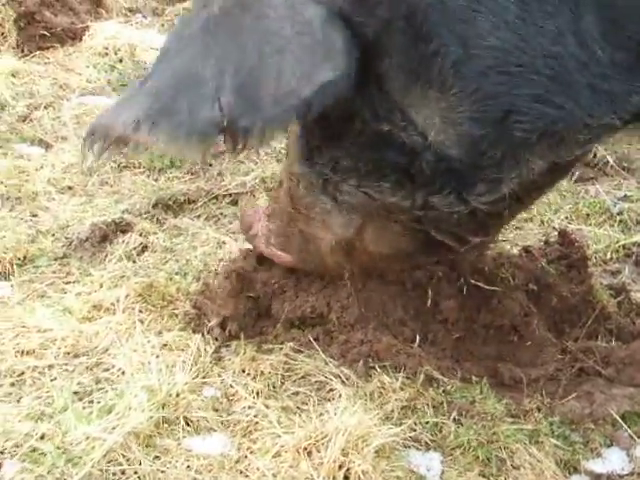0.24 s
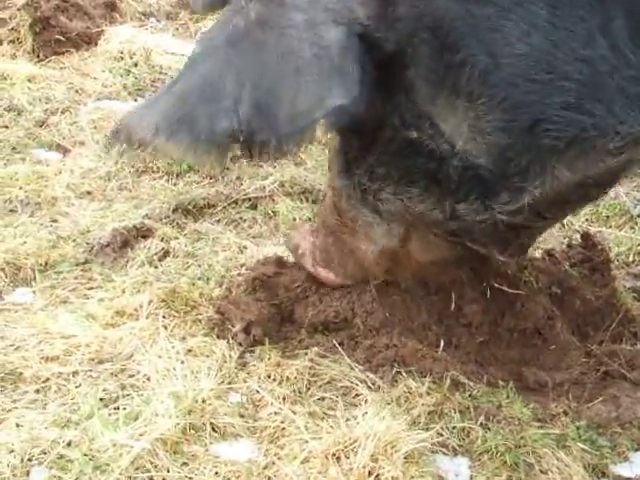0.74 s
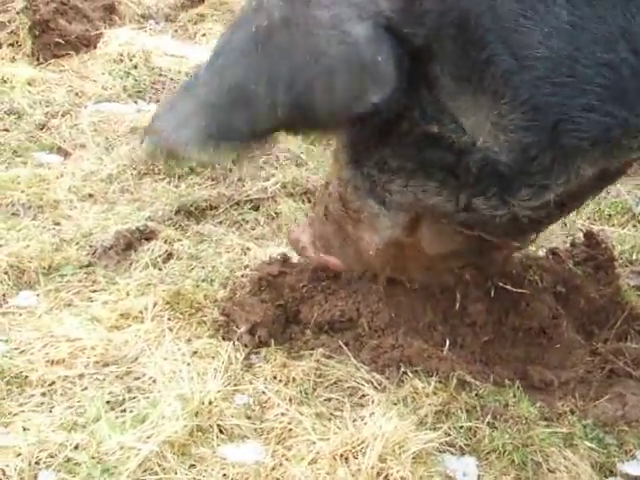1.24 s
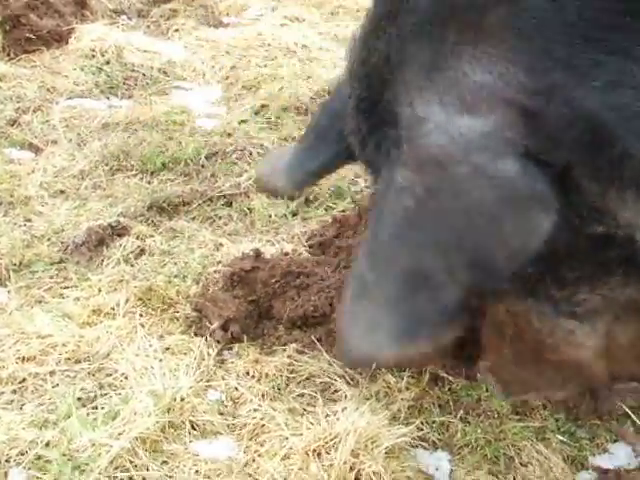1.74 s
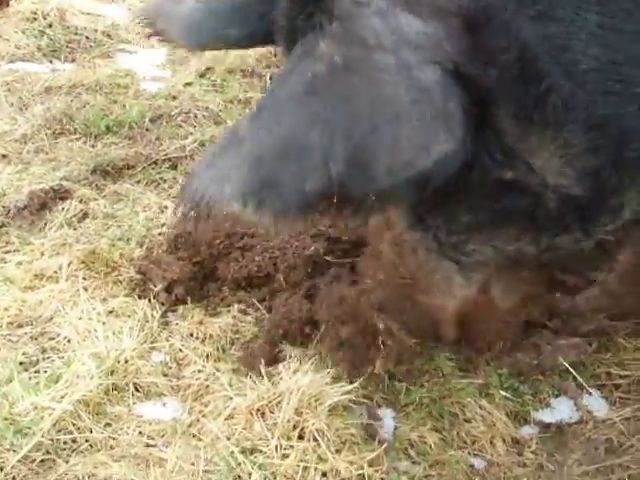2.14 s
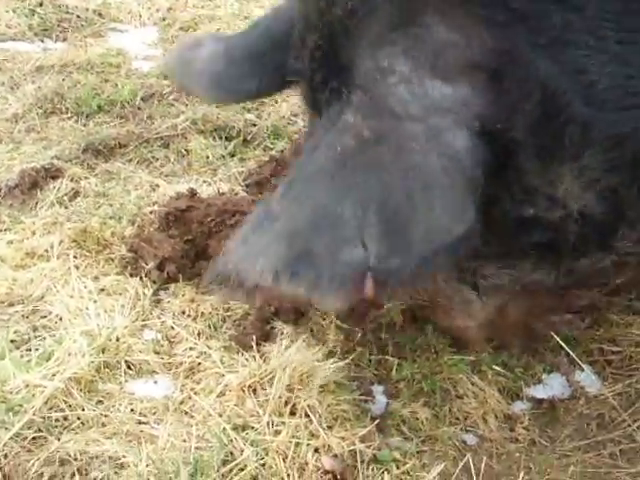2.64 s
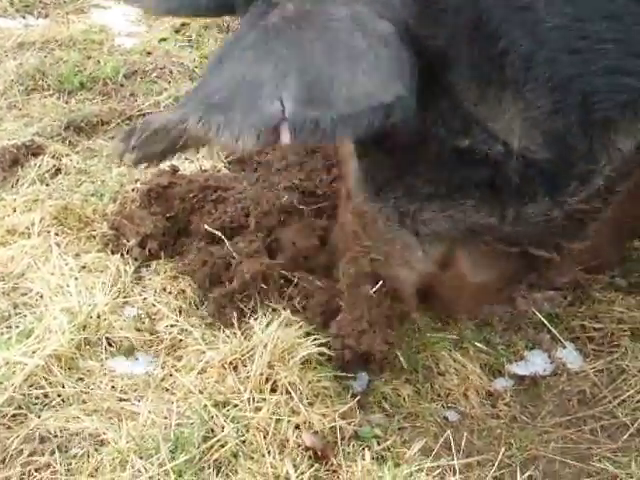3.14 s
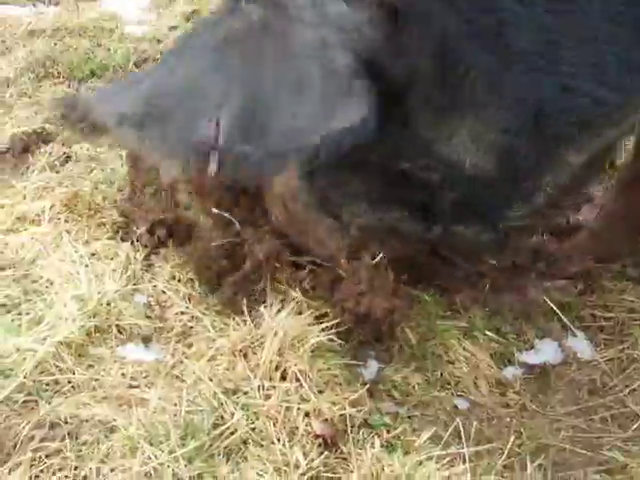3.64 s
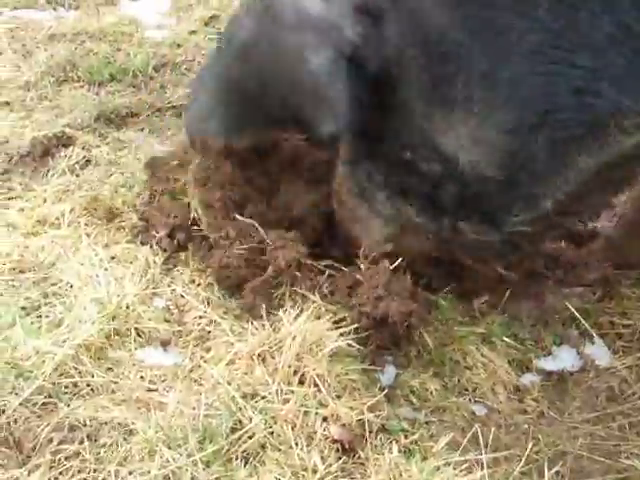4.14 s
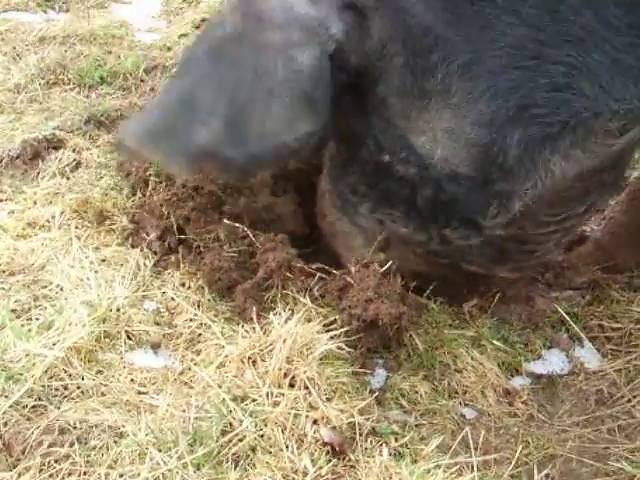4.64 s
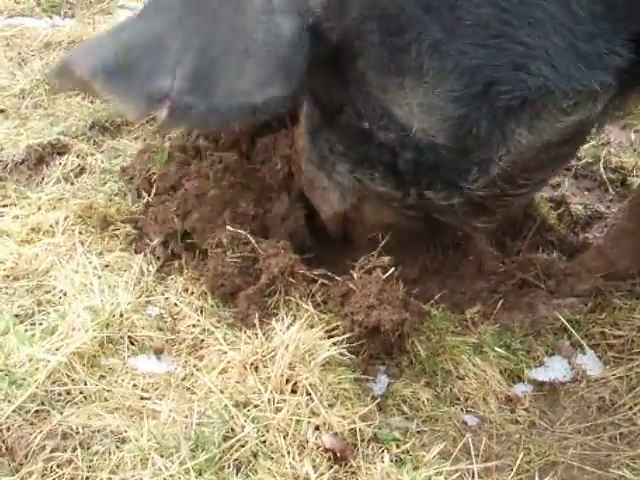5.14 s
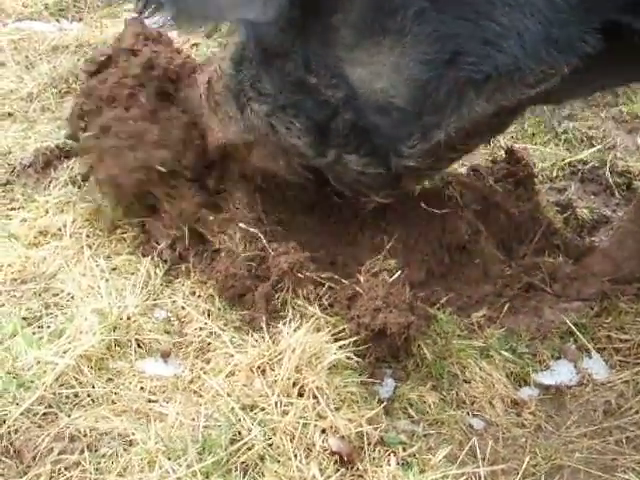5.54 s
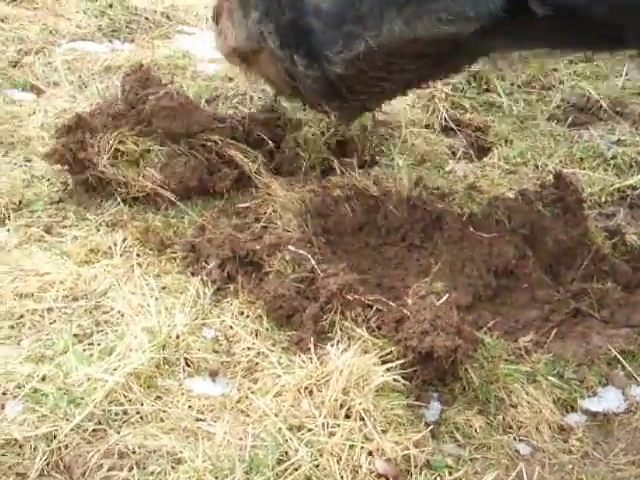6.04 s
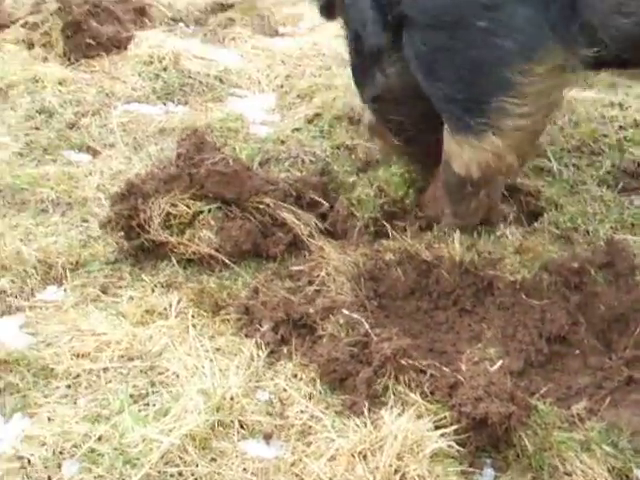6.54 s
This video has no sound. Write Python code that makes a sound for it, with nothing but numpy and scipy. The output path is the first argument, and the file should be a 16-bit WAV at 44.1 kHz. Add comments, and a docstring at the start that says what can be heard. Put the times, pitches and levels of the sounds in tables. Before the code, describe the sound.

A pig roots through soil and dry grass with crackles, snaps and wet lip smacks, while chicks peep softly nearby.

```python
"""Pig rooting in a pasture

A pig shoves its snout through crumbly soil and dry grass: roots snap, its lips smack, clods tumble
and it snuffles. Chicks peep and twitter softly nearby, each twitter sung by both sides of the syrinx.
Underneath lies a bed of steady hiss, light wind and a camera's thin whine."""
import sys
import numpy as np
from scipy import signal
from scipy.fft import rfft, irfft, next_fast_len
from scipy.io import wavfile
from scipy.ndimage import map_coordinates

SR = 44100
rng = np.random.default_rng(int(sys.argv[2]) if len(sys.argv) > 2 else 0)


def log_audio(samples):
    """Write samples as a 16-bit WAV file to the path given in sys.argv[1]."""
    # one column per channel
    frames = np.atleast_2d(samples).T
    # limit to full scale, then quantise
    limited = np.clip(frames, -1, 1)
    pcm = np.round(limited * 32767).astype(np.int16)
    wavfile.write(sys.argv[1], SR, pcm)


N = 298557
TIME = np.arange(N) / SR

# tone of the steady hiss: freq_hz, gain_db
HISS_EQ = [(50, -19.5), (110, -11.5), (280, 3.5), (600, -4.5), (1150, -4.5), (1900, -4), (2800, -3.5),
           (5000, -6), (7600, -7.5), (9000, -9)]
# low rumble of wind: freq_hz, gain_db
WIND_EQ = [(8, -5), (25, -2), (42, 0), (60, -2), (85, -5.5), (120, -10), (200, -22), (500, -50)]
# breaths of wind on the microphone: peak_s, length_s, level_db
WIND_PUFFS = [(.63, 0.11, -53), (1.3, 0.25, -52), (2.15, 0.13, -58), (3.37, 0.18, -53.5), (4.63, 0.27, -56),
              (6.12, 0.56, -56.5)]
# the light air between them: time_s, level_db
BREEZE_LEVELS = [(0, -60), (.3, -60), (.6, -57), (2.4, -56.5), (2.9, -59), (4, -58), (5.2, -55.5),
                 (5.6, -58), (6.77, -54)]
# the two tones of the camera's whine: pitch_hz, level_db
WHINE_TONES = [(7867, -61), (8133, -61.5)]

# light nuzzling between the shoves: time_s, level_db
NUZZLE_LEVELS = [(0, -60.5), (.6, -61.5), (1.6, -57.5), (2.6, -59.5), (3.9, -62.5), (5.2, -58), (5.6, -61),
                 (6.77, -59.5)]
# shoves of the snout: peak_s, length_s, soil_db, grass_db
SNOUT_SHOVES = [(.24, .11, -60, -57.5), (1.001, 0.11, -61.5, -66.5), (1.448, .13, -53.5, -53),
                (1.981, .14, -50, -52), (2.2, 0.1, -57, -63), (2.45, 0.059, -59, -54),
                (2.589, 0.11, -60, -60.5), (2.795, 0.082, -49.5, -53), (2.907, 0.19, -51, -50),
                (3.202, 0.095, -54.5, -55.5), (3.35, 0.12, -52.5, -55.5), (3.569, 0.19, -51, -54),
                (3.838, .1, -57, -67.5), (4.109, 0.22, -55, -59), (4.271, .08, -52.5, -53.5),
                (4.465, 0.089, -61, -53), (4.799, 0.054, -56, -59), (4.975, 0.27, -62.5, -56),
                (5.755, 0.052, -59, -60), (6.078, 0.28, -60.5, -53), (6.294, .11, -61, -54),
                (6.449, .14, -62, -49.5), (6.621, .09, -59, -57), (6.76, .05, -53.5, -59)]
# dull body of crumbling soil: freq_hz, gain_db
SOIL_EQ = [(80, -24.5), (170, 0), (300, 1), (700, 2.5), (1200, -5.5), (2200, -2), (4000, -26.5),
           (8000, -47.5)]
# bright crackle of dry grass: freq_hz, gain_db
GRASS_EQ = [(500, -23.5), (1200, -7.5), (2000, -1), (3300, 2.5), (5000, 2.5), (7500, 0), (9000, 1)]
# ticking crumbs and stalks of several sizes: pitch_hz, gain_db
STALK_TICKS = [(900, -10.5), (1900, -2), (3100, -1.5), (4600, -6), (6800, 2.5)]

# peeps, a few of them short steep falls trailing a twitter: start_s, length_s, pitch_hz, glide_share,
# arch_share, level_db (shares of the pitch)
CHICK_PEEPS = [(0.085, .066, 2600, -0.041, .13, -51), (.657, 0.038, 2880, -.17, 0, -55.5),
               (.729, .08, 2400, -.18, 0, -58.5), (1.04, 0.044, 4150, -.04, 0.014, -51.5),
               (1.708, 0.072, 2516, 0.13, .04, -48.5), (1.816, 0.066, 2670, -0.0081, -0.0096, -47.5),
               (2.204, .032, 2950, -.3, 0, -50), (2.355, 0.034, 2910, -0.12, 0.0053, -48),
               (2.567, 0.063, 2640, -.18, -.05, -51), (3.005, 0.12, 2230, -0.084, -0.037, -56),
               (3.261, 0.07, 2300, .05, 0.016, -57.5), (3.451, 0.22, 2080, -0.0085, 0.04, -59.5),
               (3.67, 0.058, 2300, .05, 0, -59), (3.793, 0.084, 2400, -0.13, .1, -52.5),
               (4.238, .065, 2860, -0.31, 0, -52.5), (4.967, 0.049, 2670, -.09, .12, -47.5),
               (5.075, .085, 2490, -.08, 0, -55.5), (5.168, .025, 2700, -.15, 0, -51),
               (5.6, 0.035, 2890, -0.25, .03, -48), (5.648, 0.025, 2820, -.13, -0.0086, -53),
               (5.67, .075, 2510, -0.041, 0.014, -52), (5.74, .026, 2710, -.1, 0, -52),
               (6.347, 0.045, 2730, -0.0098, 0.0041, -50)]
# a twitter's lower voice, timed from the hitch in its pitch: offset_s, pitch_hz, gain_db
SYRINX_LOW = [(-.06, 4700, -16.5), (-.04, 4750, -4), (-.028, 4492, -12.5), (-.022, 3984, -7),
              (-.016, 3637, 2), (-.007, 3162, -2.5), (0, 3600, 1), (.008, 2865, 3.5), (.02, 2490, -9.5),
              (.027, 2440, -37)]
# its upper voice, from the other side of the syrinx: offset_s, pitch_hz, gain_db
SYRINX_HIGH = [(-.03, 3873, -41.5), (-.017, 4150, -7.5), (-.004, 4480, 0), (.001, 4438, -21.5),
               (.006, 3920, 0.5), (.014, 3200, -8), (.025, 2625, -16.5), (.031, 2505, -37.5)]
# runs of evenly spaced twitters: first_s, last_s, pitch_ratio, level_db
TWITTER_RUNS = [(.534, .534, 0.75, -55), (0.952, 2.635, 1.0, -49.5), (4.272, 4.945, .99, -47.5),
                (5.208, 5.208, 0.91, -53)]
# the rest of the brood joins in: peak_s, length_s, level_db
BROOD_SWELLS = [(1.3, 0.42, -52), (2.45, .5, -60), (4.55, 0.46, -54.5)]

# roots breaking: break_s, level_db, centre_hz, splinter_share (0 a clean crack, 1 all splinters)
ROOT_SNAPS = [(.162, -46, 4800, .5), (.2342, -48.5, 3500, 0.5), (.9779, -47.5, 2750, 0.76),
              (1.1113, -48, 5600, 1), (1.2091, -36.5, 3500, 0.8), (1.4047, -44.5, 3560, 0.7),
              (1.422, -42.5, 2810, 0.55), (1.4656, -44.5, 3050, .5), (1.967, -47, 4780, .2),
              (1.979, -45, 3970, .3), (1.988, -46, 3130, .6), (2.0002, -42, 3030, 0.5),
              (2.0494, -44.5, 4570, 0.3), (2.0776, -35, 3900, 0.08), (2.13, -45.5, 2177, 0.6),
              (2.1976, -45.5, 2840, .8), (2.2271, -37.5, 8040, 0.92), (2.379, -45, 5860, 0.2),
              (2.4705, -47.5, 5470, 0.5), (2.538, -43.5, 6414, 0.4), (2.7675, -45.5, 2470, 0.7),
              (2.8639, -42.5, 4900, .2), (2.909, -34, 3530, 0.2), (2.9639, -45, 3360, 0.5),
              (3.0354, -45, 3620, 0.06), (3.0998, -46, 5500, 0.2), (3.2379, -43, 4700, 0.5),
              (3.3185, -46, 5700, 0.6), (4.3261, -43, 3300, 0.1), (4.4472, -43.5, 4560, .3),
              (4.4521, -41.5, 4817, 0.4), (4.5464, -32.5, 5160, 0.19), (4.9002, -50, 6200, 0.3),
              (4.9075, -41, 3980, .1), (5.1059, -48.5, 4660, 0.7), (5.1877, -45.5, 3600, 0.9),
              (5.4094, -42, 4960, 0.57), (5.5332, -42, 5222, 0.4), (5.8025, -44, 5780, 0.5),
              (6.4297, -41.5, 4700, 0.9), (6.437, -41, 3640, 1)]
# wet smacks of lips and snout: start_s, level_db, pitch_hz
LIP_SMACKS = [(.2258, -42, 1340), (.307, -42, 2680), (.6467, -51, 973), (1.2089, -38, 3790),
              (1.2401, -36, 1970), (1.4222, -44, 1800), (1.463, -48, 2140), (2.2936, -46, 2074),
              (2.2939, -39, 2790), (2.3111, -48, 2130), (2.445, -48, 680), (2.449, -47, 2060),
              (2.7602, -42.5, 1210), (3.0101, -38, 3100), (3.0173, -38, 3280), (4.049, -47.5, 637),
              (4.1519, -45.5, 718), (4.4973, -34, 1950), (4.5471, -40.5, 1763), (5.0524, -49, 1060),
              (5.0633, -51.5, 706), (5.2349, -45, 606), (6.5752, -41.5, 3570), (6.6317, -46, 687)]
# loosened earth tumbling back onto the turf: start_s, length_s, centre_hz, level_db
FALLING_CLODS = [(1.183, 0.09, 257, -58), (1.952, 0.065, 898, -52.5), (2.799, 0.151, 300, -54.5),
                 (3.295, 0.36, 701, -59.5), (5.879, 0.38, 300, -56), (6.42, 0.046, 850, -52.5)]
# air blown through the snout into the soil: start_s, length_s, centre_hz, level_db
SNOUT_PUFFS = [(2.752, 0.026, 1260, -46), (2.785, 0.028, 1080, -44), (3.049, 0.039, 710, -53.5),
               (3.189, 0.029, 736, -50.5), (3.803, 0.074, 371, -53.5), (4.019, 0.051, 760, -49),
               (4.12, 0.057, 637, -51), (4.128, 0.11, 407, -52.5), (4.211, .075, 624, -52),
               (4.803, 0.07, 676, -53), (5.726, 0.062, 690, -50)]
# treble roll-off over the whole mix: freq_hz, gain_db
TREBLE_EQ = [(7700, 0.5), (8200, -6.5), (8600, -16.5), (8900, -28.5), (9200, -49.5)]

WHINE_FLIPS_PER_S, TOP_HZ = 30, 9222
NUZZLE_GRASS_DB = -1.5  # shifts the grass layer while nuzzling
TWITTER_GAP_S, TWITTER_TEMPO_SPREAD, BROOD_REST_DB = .138, .1, -61.5
RUN_SAG_DB, RUN_SAG_PITCH = 3.5, .062  # a run is softer and lower at both ends
ECHO_DB, ECHO_T60_S = -6.5, .14
FIBRE_HZ, FIBRE_DB, FIBRE_SCATTER_DB = 4800, 4, 2  # level rides on the shove's grass
CRACK_WIDTH_HZ, SPLINTER_WIDTH_HZ = 7172, 4620  # a clean break is broader than a splintering one
BREAK_S, BREAK_RAGGED = .00055, .18  # the strands of a root do not all part at once
JOLT_HZ, JOLT_DB = 910, -9  # a root that parts cleanly jolts the soil round it
SMACK_HZ, SMACK_T60_S, SMACK_SIZE_LAW = 2020, .022, .93  # larger, lower pockets ring longer


def amp(db):
    """Decibels to gain."""
    return 10 ** (np.asarray(db) / 20)


def unit(x):
    """Scale to rms 1."""
    return x / np.sqrt(np.mean(x ** 2) + 1e-20)


def wobble(rate, size=N):
    """A smooth random curve, rate knots a second."""
    knots = rng.standard_normal(int(size * rate / SR) + 4)
    return map_coordinates(knots, [np.arange(size) * rate / SR])


def filtered(x, response):
    """Filter x by a gain given as a function of frequency."""
    size = next_fast_len(N + 8192)
    return irfft(rfft(x, size) * response(np.fft.rfftfreq(size, 1 / SR)), size)[:N]


def eq(x, points):
    """Shape x by (freq_hz, gain_db) points on a log axis."""
    freqs, db = np.transpose(points)
    return filtered(x, lambda hz: amp(np.interp(np.log(hz + 1), np.log(freqs), db)))


def resonate(x, hz, *widths_hz):
    """Pass x through a resonance at hz, once for each width."""
    for width in widths_hz:
        x = signal.lfilter(*signal.iirpeak(hz, hz / np.clip(width, 30, 8000), SR), x)
    return x


def add(track, s, x):
    """Mix x into the track from time s."""
    part = track[max(round(s * SR), 0):][:len(x)]
    part += x[:len(part)]


def burst(x, db):
    """Scale a short sound so that its energy equals 10 ms at this level."""
    return amp(db) * x * np.sqrt(.01 * SR / np.sum(x ** 2))


def grains(rate, spread_db):
    """Tiny fractures of unequal size at random moments, rate a second."""
    happens = rng.random(N) < rate / SR
    size = amp(spread_db * np.minimum(rng.exponential(size=N), 4))
    return unit(happens * size * rng.choice([-1, 1], N))


def swells(rows, rest_db):
    """A fader ride: bell-shaped swells (peak_s, length_s, level_db) add their power to a resting level."""
    power = sum(amp(db) ** 2 * np.exp(-np.pi * ((TIME - s) / length) ** 2) for s, length, db in rows)
    return np.sqrt(amp(rest_db) ** 2 + power)


def background():
    """The bed: steady hiss, wind buffeting the microphone and a whine that keeps flipping polarity."""
    hiss = amp(-51.5) * unit(eq(rng.standard_normal(N), HISS_EQ))
    buffet = unit(eq(rng.standard_normal(N), WIND_EQ) * amp(2 * wobble(12)))
    wind = swells(WIND_PUFFS, np.interp(TIME, *np.transpose(BREEZE_LEVELS))) * buffet
    polarity = np.sign(np.sin(np.pi * WHINE_FLIPS_PER_S * TIME))
    whine = sum(amp(db) * np.sqrt(2) * np.sin(2 * np.pi * hz * TIME) for hz, db in WHINE_TONES)
    return hiss + wind + polarity * whine


def rooting():
    """Under the snout, soil crumbles and dry grass crackles in clumps, dotted with ticking stalks."""
    nuzzle_db = np.interp(TIME, *np.transpose(NUZZLE_LEVELS))
    soil_gain = swells([(s, length, db) for s, length, db, _ in SNOUT_SHOVES], nuzzle_db)
    grass_shoves = [(s, length, db) for s, length, _, db in SNOUT_SHOVES]
    grass_gain = swells(grass_shoves, nuzzle_db + NUZZLE_GRASS_DB)
    clumps = amp(2 * wobble(80))
    crumbs = grains(rate=450, spread_db=3.5) + .5 * rng.standard_normal(N)
    crackle = grains(rate=1000, spread_db=1) + .5 * rng.standard_normal(N)
    soil = unit(eq(crumbs, SOIL_EQ) * clumps * amp(2.15 * wobble(40)))
    grass = unit(eq(crackle, GRASS_EQ) * clumps)
    ticks = unit(sum(amp(db) * unit(resonate(grains(rate=45, spread_db=3.5), hz, .22 * hz))
                     for hz, db in STALK_TICKS))
    return soil_gain * amp(-.5) * soil + grass_gain * (amp(5.5) * grass + amp(-2) * ticks)


def whistle(hz, waver):
    """A pure bird tone that flutters in pitch and strength."""
    pitch = hz * (1 + waver * wobble(168.9, size=len(hz)))
    flutter = amp(2.6 * wobble(130, size=len(hz)) - .7)
    return np.sqrt(2) * np.sin(2 * np.pi * np.cumsum(pitch) / SR) * flutter


def peeps():
    """Soft whistles that glide, most with an arch in their pitch; a few short steep ones trail a twitter."""
    out = np.zeros(N)
    for s, length, hz, glide, arch, db in CHICK_PEEPS:
        progress = np.linspace(0, 1, int(length * SR))
        bow = np.abs(np.sin(np.pi * progress))
        pitch = hz * (1 + glide * (progress - .5) + arch * (bow - .5))
        add(out, s, amp(db) * bow ** .32 * whistle(pitch, waver=.016))
    return out


def twitters(calls):
    """Quick falling calls with a hitch in them, one voice from each side of the syrinx."""
    out = np.zeros(N)
    for s, ratio, db in calls:
        tempo = np.exp(rng.normal(0, TWITTER_TEMPO_SPREAD))
        for voice in (SYRINX_LOW, SYRINX_HIGH):
            offsets, hz, gain_db = np.transpose(voice)
            offsets = offsets * tempo
            t = np.arange(offsets[0], offsets[-1], 1 / SR)
            pitch = ratio * rng.normal(1, .01445) * np.interp(t, offsets, hz)
            envelope = amp(db + np.interp(t, offsets, gain_db))
            add(out, s + offsets[0], envelope * whistle(pitch, waver=.02535))
    return out


def brood_calls():
    """Cues for the brood's faint, irregular chatter: time_s, pitch_ratio, level_db."""
    moments = np.cumsum(rng.uniform(.04, .16, size=66))
    level_db = 20 * np.log10(swells(BROOD_SWELLS, BROOD_REST_DB))
    return [(s, rng.uniform(.77, 1.05), np.interp(s, TIME, level_db)) for s in moments]


def run_calls():
    """Cues for runs that swell and rise towards their middle: time_s, pitch_ratio, level_db."""
    for first, last, ratio, db in TWITTER_RUNS:
        count = round((last - first) / TWITTER_GAP_S) + 1
        for k, s in enumerate(np.linspace(first, last, count)):
            sag = 1 - np.sin(np.pi * (k + .5) / count)
            yield s, ratio * (1 - RUN_SAG_PITCH * sag), db - RUN_SAG_DB * sag


def chicks():
    """Twitters and peeps, with a short echo scattered back by the pasture."""
    voices = twitters(list(run_calls()) + brood_calls()) + peeps()
    t = np.arange(SR // 3) / SR
    scatter = rng.standard_normal(len(t)) * amp(-60 * t / ECHO_T60_S) * (t > .008)  # 8 ms pre-delay
    echo = signal.fftconvolve(voices, scatter / np.linalg.norm(scatter))[:N]
    return voices + amp(ECHO_DB) * echo


def torn_fibres():
    """Each shove tears two thin fibres, louder the more grass it drags: cues laid out like ROOT_SNAPS."""
    for s, length, _, grass_db in SNOUT_SHOVES:
        for when, strength, pitch in rng.standard_normal(size=(2, 3)):
            db = grass_db + FIBRE_DB + FIBRE_SCATTER_DB * strength
            hz = min(FIBRE_HZ * np.exp(.3 * pitch), TOP_HZ)
            yield s + .25 * length * when, db, hz, .3


def snaps():
    """A root or fibre strains, parts with a sharp crack that jolts the soil, then splinters briefly."""
    out = np.zeros(N)
    t = np.arange(-SR // 300, SR // 25) / SR  # the break falls at zero
    after = np.maximum(t, 0)
    click = 1. * (t == 0)
    strain = np.exp(np.minimum(t, 0) / .00091)
    jolt = amp(JOLT_DB) * unit(resonate(click, JOLT_HZ, 1.8 * JOLT_HZ))
    for s, db, hz, share in list(ROOT_SNAPS) + list(torn_fibres()):
        width = (1 - share) * CRACK_WIDTH_HZ + share * SPLINTER_WIDTH_HZ
        fade = amp(-60 * after / (.011 + .026 * share)) + .13 * amp(-60 * after / .1)
        splinters = unit(resonate(rng.standard_normal(len(t)) * fade * strain, hz, width, width))
        strands = BREAK_RAGGED * rng.standard_normal(len(t)) * np.exp(-after / BREAK_S) * (t > 0)
        crack = unit(resonate(click + strands, hz, width, width))
        snap = np.sqrt(1 - share) * (crack + jolt) + np.sqrt(share) * splinters
        add(out, s + t[0], burst(snap, db + 2))
    return out


def smacks():
    """A wet seal opens and the pocket behind it rings briefly, its pitch drifting as it widens."""
    out = np.zeros(N)
    t = np.arange(SR // 15) / SR
    for s, db, hz in LIP_SMACKS:
        t60 = SMACK_T60_S * (SMACK_HZ / hz) ** SMACK_SIZE_LAW
        glide = 1 + rng.normal(0, .039) * np.minimum(t / t60, 1)
        ring = np.sin(2 * np.pi * np.cumsum(hz * glide) / SR)
        squelch = unit(resonate(rng.standard_normal(len(t)), hz, .27 * hz, .76 * hz))
        envelope = amp(-60 * t / t60) * (1 - np.exp(-t / .00012))
        add(out, s, burst((ring + .6 * squelch) * envelope, db + .3))
    return out


def clods():
    """Lumps of earth land as a patter of dull thuds."""
    out = np.zeros(N)
    for s, length, hz, db in FALLING_CLODS:
        n = int(length * SR)
        lumps = grains(rate=260, spread_db=3)[:n]
        thuds = unit(resonate(lumps, hz, .735 * hz, .85 * hz))
        envelope = np.abs(np.sin(np.linspace(0, np.pi, n))) ** .45
        add(out, s, amp(db) * thuds * envelope)
    return out


def snuffles():
    """Short fluttering puffs resonate in the nostrils."""
    out = np.zeros(N)
    for s, length, hz, db in SNOUT_PUFFS:
        n = int(length * SR)
        breath = rng.standard_normal(n) * amp(3.5 * wobble(90, size=n))
        puff = unit(resonate(breath, hz, .38 * hz, .503 * hz))
        add(out, s, amp(db) * puff * np.sin(np.linspace(0, np.pi, n)))
    return out


def scene():
    """The mono mix: pig up front, chicks behind it, the bed underneath."""
    pig = rooting() + clods() + snaps() + smacks() + snuffles()
    return (pig + chicks() + background())[None]


def record(dry):
    """The top end rolls off into a brick-wall cut."""
    softened = eq(dry[0], TREBLE_EQ)
    return filtered(softened, lambda hz: hz < TOP_HZ)[None]


dry = scene()
out = record(dry)
log_audio(out)
```